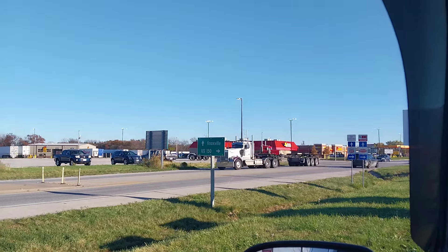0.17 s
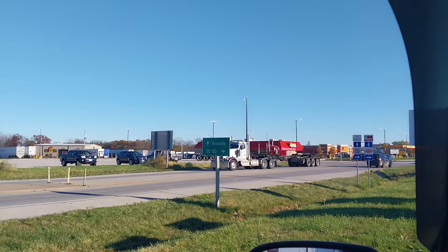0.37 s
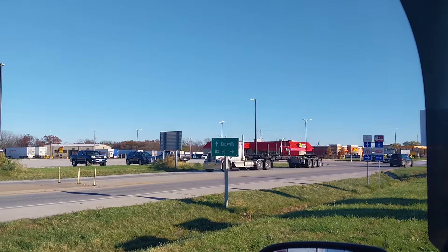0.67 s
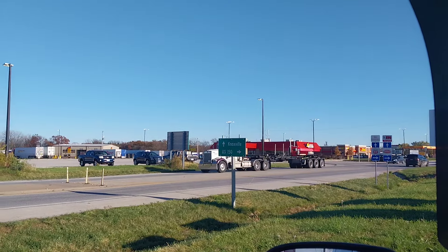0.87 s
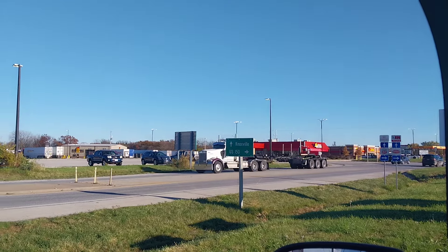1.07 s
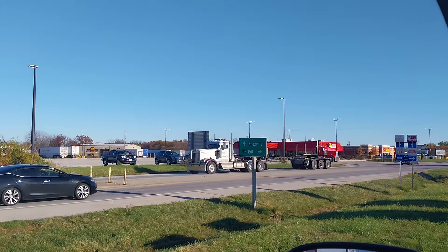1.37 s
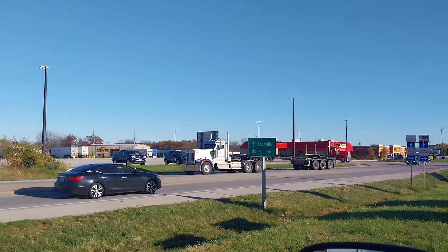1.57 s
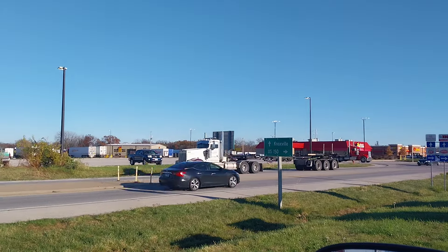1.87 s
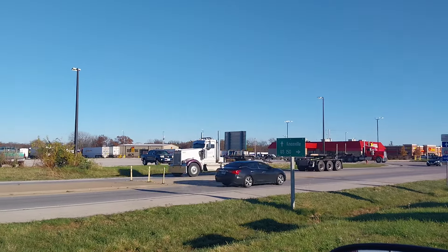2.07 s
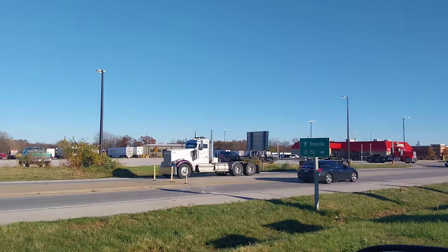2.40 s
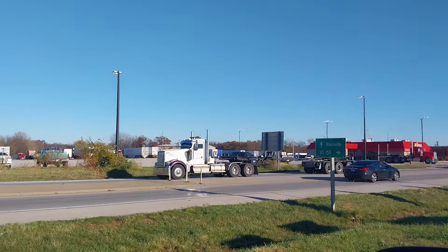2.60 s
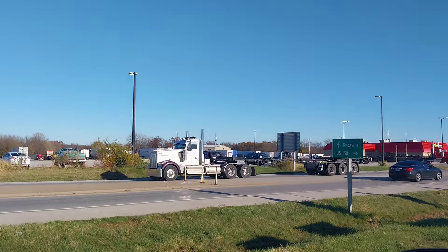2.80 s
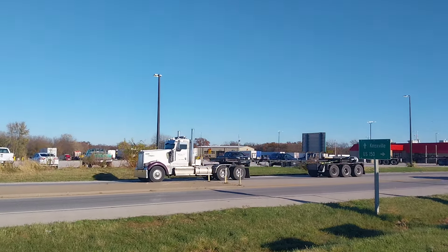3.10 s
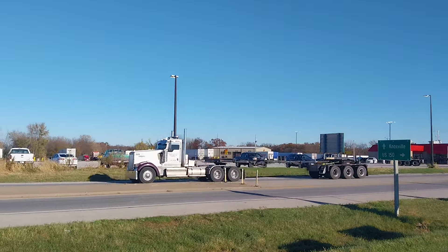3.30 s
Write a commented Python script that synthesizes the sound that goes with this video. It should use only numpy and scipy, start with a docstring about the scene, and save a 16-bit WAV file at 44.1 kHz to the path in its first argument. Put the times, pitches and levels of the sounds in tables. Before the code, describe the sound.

Diesel truck engine drones and growls as it pulls away, with rushing tyre and traffic noise.

```python
"""Diesel truck pulling through a junction

A heavy six-cylinder truck pulls slowly away, lifting off the throttle to shift, while a car rolls by.
Firing harmonics make its drone, knocks ring its body, and filtered noise is the hiss of tyres and clatter.
Another engine hums briefly at first; gears whine, metal squeaks, and a turbo whistles down at the end.
A phone at an open car window listens; its right port is shaded and dull."""
import sys
import numpy as np
from scipy import signal
from scipy.fft import rfft, irfft, next_fast_len
from scipy.io import wavfile
from scipy.ndimage import uniform_filter1d

SR = 44100
rng = np.random.default_rng(int(sys.argv[2]) if len(sys.argv) > 2 else 0)


def digitize_waveform(pressure):
    """Quantize a signal to 16-bit integers and store it at the path in sys.argv[1].

    Rows of a 2-D input are taken as channels; values are limited to [-1, 1].
    """
    field = np.atleast_2d(pressure).T
    bounded = np.clip(field, -1, 1)
    quanta = np.round(bounded * 32767).astype(np.int16)
    wavfile.write(sys.argv[1], SR, quanta)


N = 152145  # samples
EDGE = (next_fast_len(N + 8000) - N + 1) // 2  # samples of margin at each end for spectral filtering
PADDED = N + 2 * EDGE

# Truck noise: (time [s], level of the body growl [dB], level of the tyre and fan noise [dB])
TRUCK_LEVELS = [(0, -42, -42.5), (.5, -47, -42), (.8, -78, -40.5), (1.05, -42, -37.5), (1.4, -42, -42),
                (1.8, -39, -36), (2.1, -38, -33.5), (2.5, -37, -33.5), (2.9, -33, -33), (3.1, -35.5, -36),
                (3.2, -42.5, -38.5), (3.45, -37, -38)]


def undb(db):
    """Amplitude ratio from a level: 20 dB is a factor of ten."""
    return 10 ** (np.asarray(db) / 20)


def over_time(table):
    """Linear interpolation in time of every column after the first."""
    rows = np.array(table, float)
    t = np.arange(N) / SR
    return [np.interp(t, rows[:, 0], column) for column in rows.T[1:]]


def over_hz(table, hz):
    """Linear interpolation on a logarithmic frequency axis of every column after the first."""
    rows = np.array(table, float)
    return [np.interp(np.log(hz), np.log(rows[:, 0]), column) for column in rows.T[1:]]


def bin_hz(size):
    """Frequencies of the Fourier bins, with zero raised to 1 Hz so that logarithms exist."""
    return np.maximum(np.fft.rfftfreq(size, 1 / SR), 1)


def walk(rate):
    """Band-limited random modulation: values held 1 / rate s and averaged twice; spread near 1."""
    hold = int(SR / rate)
    steps = np.repeat(rng.standard_normal(400), hold)[:N + hold]
    smooth = uniform_filter1d(uniform_filter1d(steps, hold), hold)
    return np.sqrt(2) * smooth[:N]


def tone(turns, db):
    """Sinusoid from its phase in turns; its peak is root two times its rms level."""
    return np.sqrt(2) * undb(db) * np.cos(2 * np.pi * turns)


def glide(table, wobble_db, rate):
    """Frequency modulation: phase is the running sum of frequency; silent outside the table's times."""
    hz, db = over_time(table)
    t = np.arange(N) / SR
    on = (t >= table[0][0]) & (t <= table[-1][0])
    return on * tone(np.cumsum(hz) / SR, db + wobble_db * walk(rate))


def band(x, hz, width):
    """Resonance: a band-pass passes the energy near one frequency."""
    edges = [hz - width / 2, hz + width / 2]
    return signal.sosfilt(signal.butter(2, edges, "band", fs=SR, output="sos"), x)


def coloured(colour, level_db):
    """Spectral shaping of two unrelated white noises, set to one rms level curve."""
    gain = undb(over_hz(colour, bin_hz(N))[0])
    x = irfft(rfft(rng.standard_normal((2, N))) * gain, N)
    return x / np.std(x) * undb(level_db)


def spectrum(x):
    """Fourier analysis of a sound whose ends are mirrored and faded."""
    return rfft(np.pad(x, EDGE, "reflect") * signal.windows.tukey(PADDED, 2 * EDGE / PADDED))


def exhaust():
    """Harmonic series: four firing harmonics add up to pulses; returns sound and firing phase [turns]."""
    # Drone: (time [s], firing rate [Hz], level of the 1st, 2nd, 3rd, 4th harmonic [dB])
    drone_track = [(0.0, 55.66, -37, -21.5, -35.5, -47), (0.14, 55.45, -24, -20.5, -25, -38.5),
                   (0.49, 56.05, -28, -18.5, -38, -36), (0.58, 53.56, -36, -34, -36, -35.5),
                   (0.61, 53.2, -40, -24.5, -38, -33), (0.65, 53.9, -48, -38, -42, -39.5),
                   (0.72, 55.64, -35.5, -35, -38, -40), (0.84, 54.47, -44, -23.5, -37, -47),
                   (0.86, 54.16, -47, -40, -37, -44), (0.9, 52.9, -36, -31, -45, -38.5),
                   (0.95, 52.12, -32, -24, -32, -26.5), (1.09, 55.33, -26, -17.5, -29.5, -34),
                   (1.11, 53.58, -32, -23.5, -31, -71), (1.13, 51.94, -31, -21.5, -44, -30.5),
                   (1.2, 47.72, -37, -34, -27.5, -30), (1.24, 48.7, -40, -26, -44, -36),
                   (1.32, 51.64, -32, -18.5, -34.5, -27), (1.36, 51.7, -29, -21, -25, -47),
                   (1.47, 49.64, -32, -25.5, -34, -30), (1.62, 51.2, -28.5, -18.5, -29, -27),
                   (1.7, 51.15, -30, -24.5, -29.5, -32), (1.85, 52.44, -23, -24, -23, -24.5),
                   (1.95, 52.75, -24.5, -24.5, -32.5, -41.5), (2.38, 54.41, -24, -22, -25, -32),
                   (2.48, 55.09, -20, -19.5, -26.5, -43), (2.5, 55.33, -20, -24, -30, -31),
                   (2.67, 56.14, -21.5, -23, -36, -33.5), (2.92, 57.36, -24, -17, -33.5, -29.5),
                   (3.08, 56.46, -24.5, -18.5, -31, -35), (3.17, 56.15, -27, -17, -33.5, -35.5),
                   (3.31, 53.12, -49, -38, -37, -39.5), (3.34, 54.4, -38, -52.5, -38, -48),
                   (3.41, 53.9, -40, -36, -50, -42.5), (3.45, 53.3, -38, -28, -32, -41)]
    # Weaker lines from uneven cylinders: (frequency [thirds of the firing rate], level re the drone [dB])
    uneven_lines = [(5, -27), (7, -24), (8, -22), (10, -25), (11, -21), (13, -28), (14, -27)]
    wobble_db, wobble_rate, uneven_wobble_db = 1.0, 14, 4.0  # spread [dB], steps per s, spread [dB]
    drift_turns = 0.05  # phase drift per harmonic above the first
    hz, *levels_db = over_time(drone_track)
    turns = np.cumsum(hz) / SR
    out = np.zeros(N)
    for k, db in enumerate(levels_db):
        phase = (k + 1) * turns + k * drift_turns * walk(1.404)
        out += tone(phase, db + wobble_db * walk(wobble_rate))
    drone_db = 10 * np.log10(sum(undb(2 * db) for db in levels_db))  # powers add
    for thirds, db in uneven_lines:
        phase = round(thirds) * turns / 3 + rng.random() + 0.3 * walk(12)
        out += tone(phase, drone_db + db + uneven_wobble_db * walk(6.6))
    return out, turns


def growl(turns):
    """Impulse excitation of resonances: each firing knocks the body, unevenly in size and time."""
    # Engine body resonances: (frequency [Hz], width [Hz], relative gain [dB])
    body_modes = [(286, 48, -1.5), (393, 49.4, 2.5), (477, 69, 2), (591, 51, 4), (686, 33, -1),
                  (961, 110, -6.5)]
    scatter_db, jitter_s = 2.5, 0.00025  # standard deviations of knock size and time
    firings = np.flatnonzero(np.diff(np.floor(turns)))
    late, louder = rng.standard_normal((2, len(firings)))
    at = np.clip(firings + (late * jitter_s * SR).astype(int), 0, N - 1)
    knocks = np.zeros(N)
    knocks[at] = undb(scatter_db * louder)
    ring = sum(undb(db) * band(knocks, hz, width) for hz, width, db in body_modes)
    return ring / np.std(ring) * undb(over_time(TRUCK_LEVELS)[0])


def far_engine():
    """Interference: three harmonics of a second engine beat against the truck's drone."""
    # Second engine: (time [s], firing rate [Hz], level of the 1st, 2nd, 4th harmonic [dB])
    hum_track = [(0, 60, -42, -30, -28), (.25, 58.7, -42, -33, -30), (.4, 59, -42, -36, -42),
                 (.6, 60, -42, -33, -46), (.7, 60, -39, -30, -46), (.85, 57.5, -39, -32, -48),
                 (.95, 56, -52, -46, -58), (1.1, 56, -80, -80, -80)]
    hz, *levels_db = over_time(hum_track)
    turns = np.cumsum(hz) / SR + rng.random()
    return sum(tone(2 ** k * turns, db + 1.7 * walk(8.1)) for k, db in enumerate(levels_db))


def road(turns):
    """Amplitude-modulated noise: truck and traffic flicker band by band and throb with the firings."""
    # Spectrum of the truck's tyre and fan noise: (frequency [Hz], relative density [dB per Hz])
    truck_colour = [(150, -33), (250, -19.5), (298, 1.5), (355, -7.5), (476, -5), (611, -4.5), (796, -11.5),
                    (991, -11.5), (1100, -6), (1250, -18.5), (1430, -10), (1830, -11.5), (2460, -9),
                    (3300, -23), (5190, -17), (6860, -24.5), (8300, -44), (10800, -58), (18300, -120)]
    # Spectrum of distant traffic and the passing car: (frequency [Hz], relative density [dB per Hz])
    traffic_colour = [(30, -10), (45, -2), (80, 9), (150, 10), (230, 2), (290, 2.5), (350, -11), (480, -12),
                      (600, 0), (700, -3.5), (780, -10.5), (1000, -6), (1270, -8.5), (1430, -7), (2050, -9),
                      (2700, -13.5), (3400, -9.5), (4200, -13.5), (5200, -14), (6880, -17.5), (8170, -32),
                      (11000, -24.5), (15500, -37.5)]
    # Distant traffic and the passing car: (time [s], level [dB])
    traffic_track = [(0, -31.5), (.25, -33), (.5, -32), (.75, -35), (.95, -35), (1.05, -32), (1.5, -32),
                     (2.2, -32.5), (2.9, -38), (3.45, -38.5)]
    # Top treble, rustling in bursts at first; only departures from the mean count: (time [s], level [dB])
    treble_track = [(0.0, -55.5), (0.26, -57.5), (0.35, -51.5), (0.41, -56), (0.48, -47), (0.5, -54),
                    (0.57, -50), (0.59, -55), (0.66, -55), (0.69, -60.5), (0.85, -59), (0.87, -63),
                    (1.1, -55.5), (1.11, -60), (1.18, -56.5), (1.32, -61), (2.18, -58), (2.91, -63),
                    (3.19, -66.5), (3.22, -64), (3.44, -66.5), (3.45, -64)]
    flicker_db, clatter_db = 0.8, 0.6  # spread in each band; peak of the throb
    treble_from_hz = 8500
    traffic_db, treble_db = over_time(traffic_track)[0], over_time(treble_track)[0]
    truck = coloured(truck_colour, over_time(TRUCK_LEVELS)[1])
    traffic = coloured(traffic_colour, traffic_db)
    spectra = np.array([spectrum(x) for x in truck + traffic])
    # the rustle also undoes the traffic's own rise and fall
    rustle_db = treble_db - treble_db.mean() - (traffic_db - traffic_db.mean())
    out = np.zeros((2, N))
    for step in range(20):
        centre = 25 * 2 ** (step / 2)  # Hz, half an octave apart
        octaves = np.clip(np.log2(bin_hz(PADDED) / centre), -0.5, 0.5)
        share = np.cos(np.pi * octaves) ** 2  # neighbouring shares add up to one
        part = irfft(spectra * share, PADDED)[:, EDGE:-EDGE]
        gain_db = flicker_db * walk(8.71)
        if centre > treble_from_hz:
            gain_db = gain_db + rustle_db
        out += part * undb(gain_db)
    return out * undb(clatter_db * np.cos(2 * np.pi * turns))


def gear_whines():
    """Quasi-periodic tones: two faint gear whines glide in pitch."""
    # One list per whine: (time [s], frequency [Hz], level [dB])
    whine_tracks = [
        [(.4, 2060, -60), (.45, 2080, -51), (.5, 2050, -48), (.6, 1990, -53), (.68, 1980, -62), (.8, 2070, -51),
         (.85, 2050, -64)],
        [(2.65, 970, -60), (2.8, 990, -47), (3.0, 995, -47), (3.06, 990, -62)],
    ]
    return sum(glide(track, wobble_db=2.5, rate=18) for track in whine_tracks)


def squeaks():
    """Narrow-band noise under Gaussian envelopes: short metallic squeaks."""
    # (centre time [s], frequency [Hz], width [Hz], 1/e half-length [s], rms over one half-length [dB])
    squeak_list = [(1.012, 4900, 600, .011, -40), (1.15, 6500, 1000, .009, -41.5),
                   (.475, 11000, 2500, .012, -52)]
    t = np.arange(N) / SR
    out = np.zeros(N)
    for at, hz, width, length, db in squeak_list:
        burst = band(rng.standard_normal(N), hz, width) * np.exp(-((t - at) / length) ** 2)
        # the burst's energy equals that of one half-length at the level
        out += undb(db) * burst * np.sqrt(length * SR / np.sum(burst ** 2))
    return out


def turbo():
    """Frequency-modulated whistle: one tone rises briefly, then falls."""
    # (time [s], frequency [Hz], level [dB])
    whistle_track = [(2.94, 3600, -66), (2.97, 3620, -56), (3.02, 3830, -59), (3.07, 3920, -57),
                     (3.13, 3790, -55), (3.21, 3660, -49), (3.3, 3540, -54), (3.37, 3480, -53),
                     (3.45, 3450, -58)]
    return glide(whistle_track, wobble_db=1.5, rate=25)


def ports(point, noise):
    """Interaural-like differences and partial coherence; source levels hold for the ports' average."""
    # (frequency [Hz], coherence of the noise [0-1], left over right [dB], phase lead of left [rad])
    port_table = [(30, 0.84, 7, 0.15), (54.6, 0.2, -0.5, 0.27), (114, .99, 1.5, 0.32),
                  (160, 0.74, 0.7, -0.2), (214, 0.93, 1.5, 0.58), (312, 0.88, -1, 0.36),
                  (397, 1, 8.5, 0.43), (500, 1, 0, 0.77), (606, 0.95, 3, 0.56), (753, 1, -1.5, 1.83),
                  (930, 0, 6.5, -0.094), (1076, 0.78, 1, 0.73), (1250, 0.33, 7, -0.008),
                  (1850, 0.35, 8.5, 0.26), (2750, 0.24, 4.5, 0.14), (3900, .4, 7, 1.55),
                  (5870, 0, 17.5, 0.6), (8300, .12, 12.5, 1.2), (10500, .03, 15.5, -0.53),
                  (14000, .03, 34, 0)]
    like, lean_db, lead = over_hz(port_table, bin_hz(PADDED))
    like = np.clip(like, 0, 1)
    right = undb(-lean_db) * np.exp(-1j * lead)  # right port re left
    p, a, b = (spectrum(x) for x in (point, *noise))
    p = p * 2 / abs(1 + right)
    level = 2 / np.sqrt(1 + abs(right) ** 2 + 2 * like * right.real)
    a, b = a * level, b * level
    left_out = p + a
    right_out = right * (p + like * a + np.sqrt(1 - like ** 2) * b)
    return irfft(np.array([left_out, right_out]), PADDED)[:, EDGE:-EDGE]


def scene():
    """Superposition: all sources reach both ports; only the road noise is partly unrelated in them."""
    drone, turns = exhaust()
    point = drone + growl(turns) + far_engine() + gear_whines() + squeaks() + turbo()
    return ports(point, road(turns))


def record(dry):
    """Low-pass filtering: the phone cuts the top above 15.6 kHz."""
    # order 10, 0.2 dB ripple, 80 dB rejection
    return signal.sosfilt(signal.ellip(10, 0.2, 80, 15600, fs=SR, output="sos"), dry)


dry = scene()
out = record(dry)
digitize_waveform(out)
```